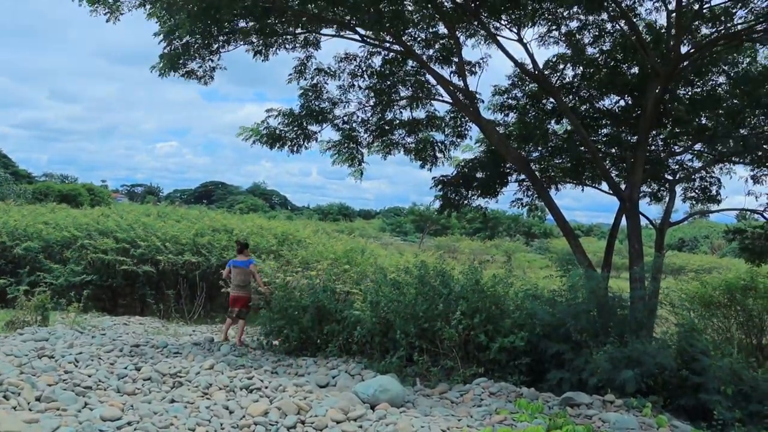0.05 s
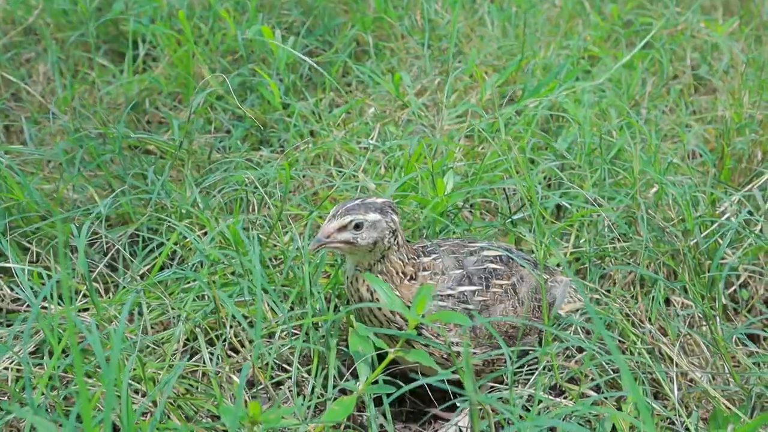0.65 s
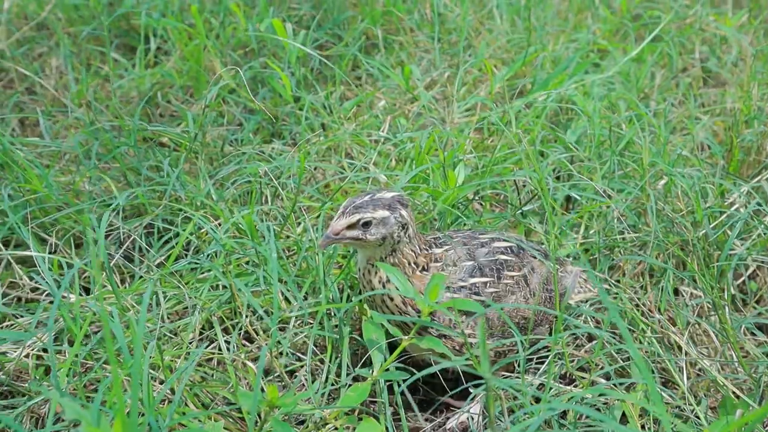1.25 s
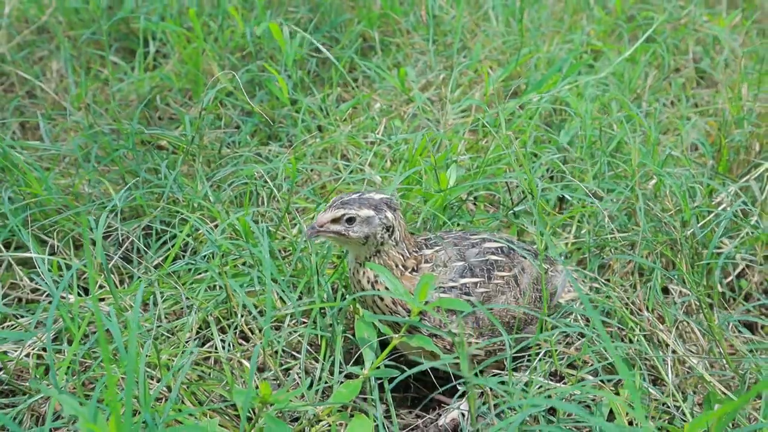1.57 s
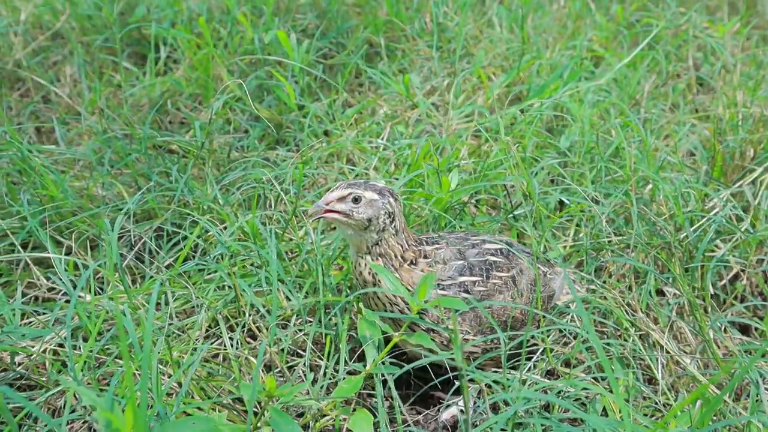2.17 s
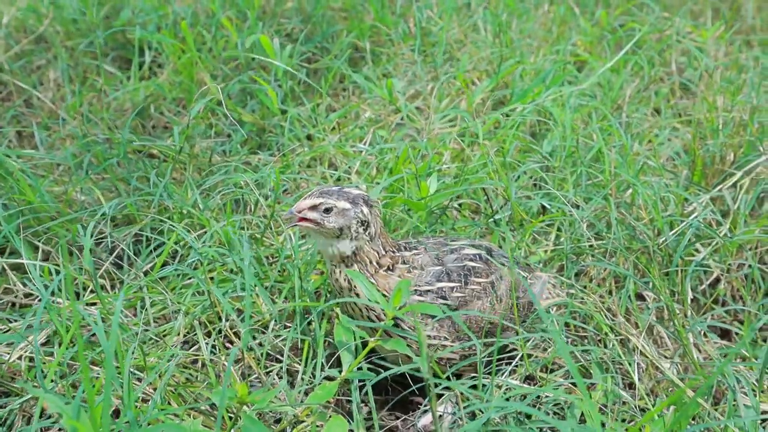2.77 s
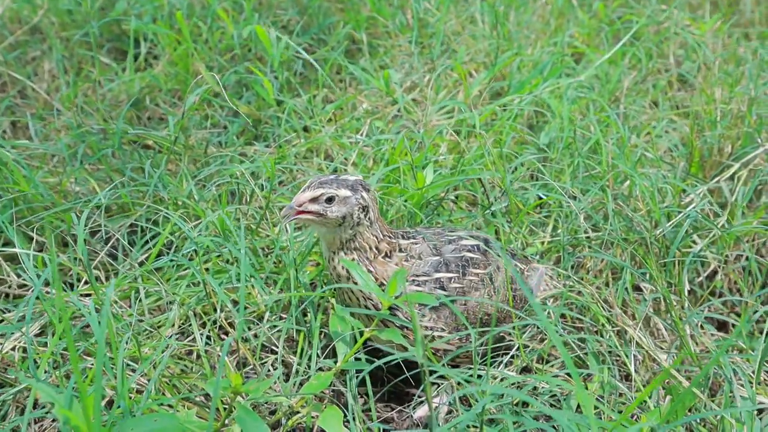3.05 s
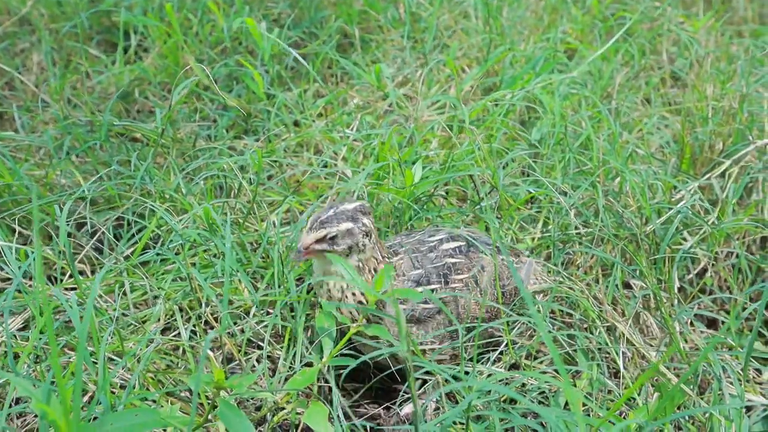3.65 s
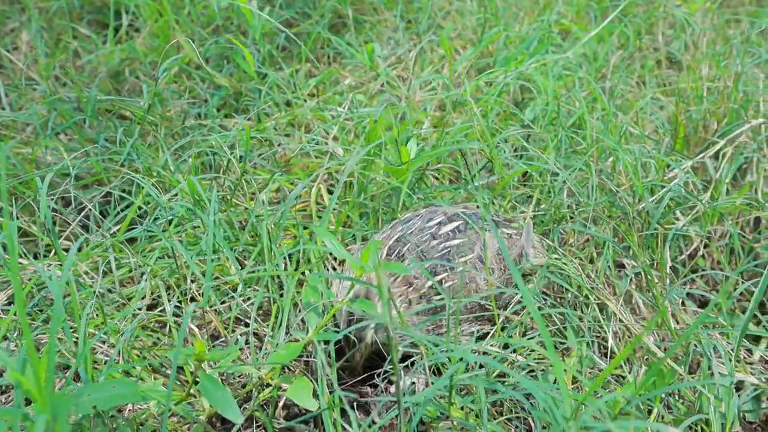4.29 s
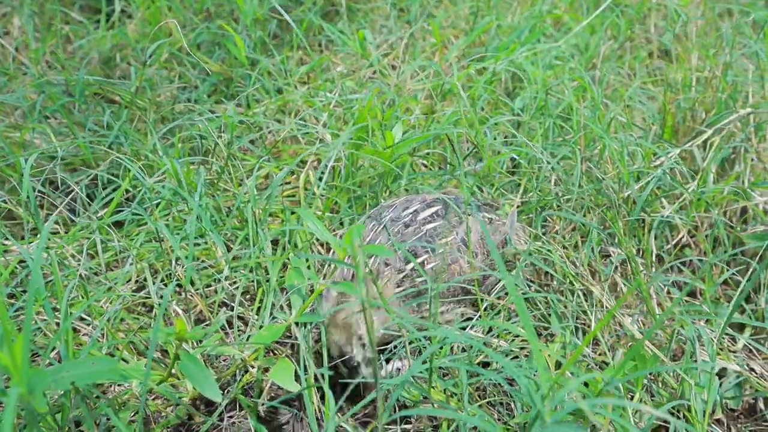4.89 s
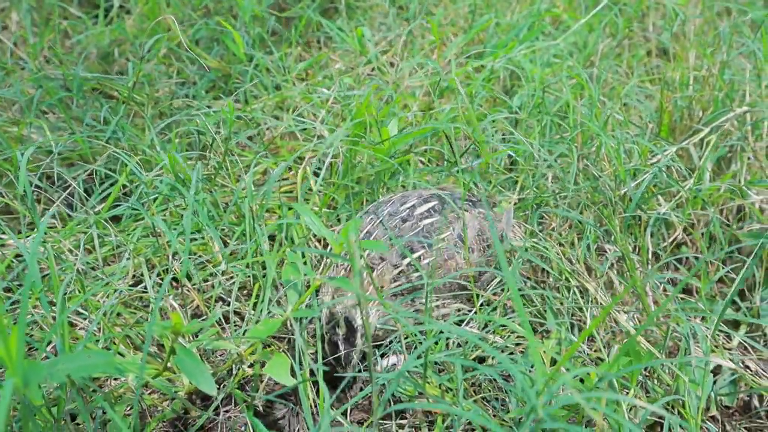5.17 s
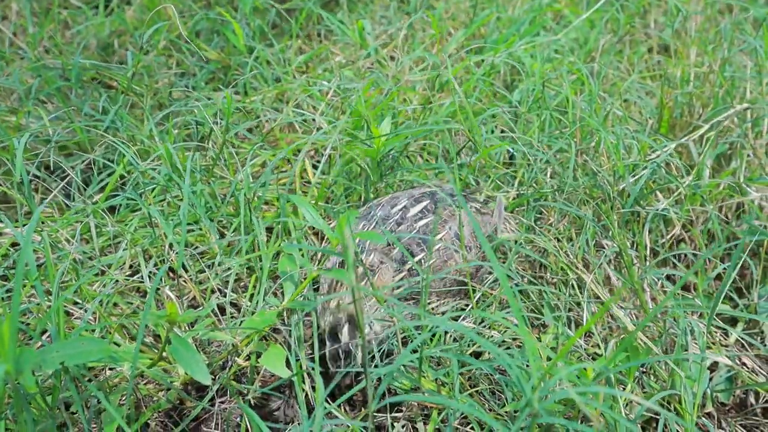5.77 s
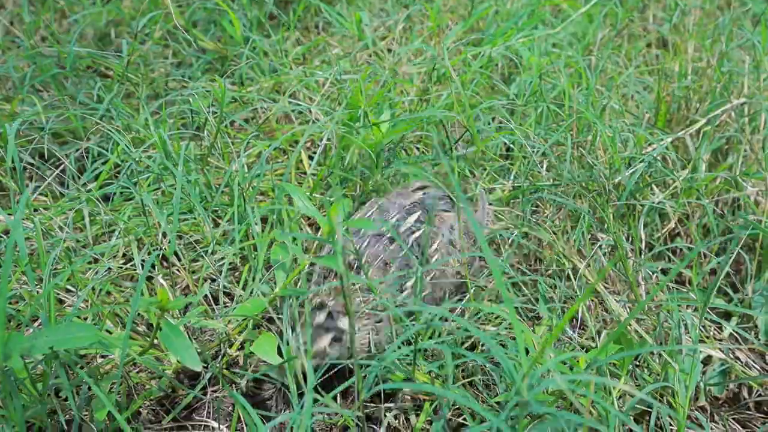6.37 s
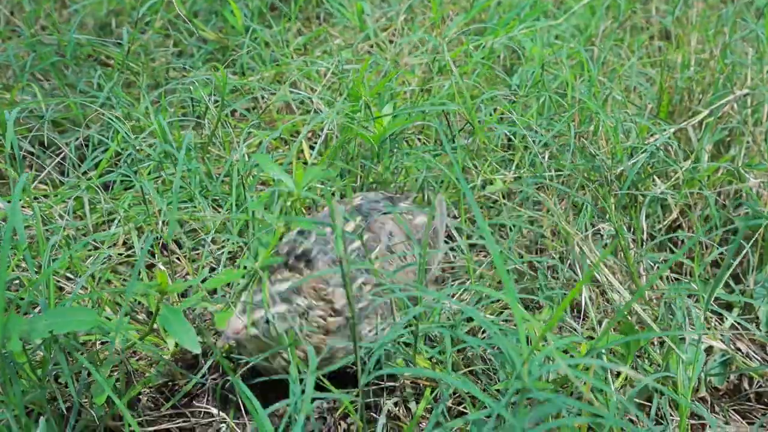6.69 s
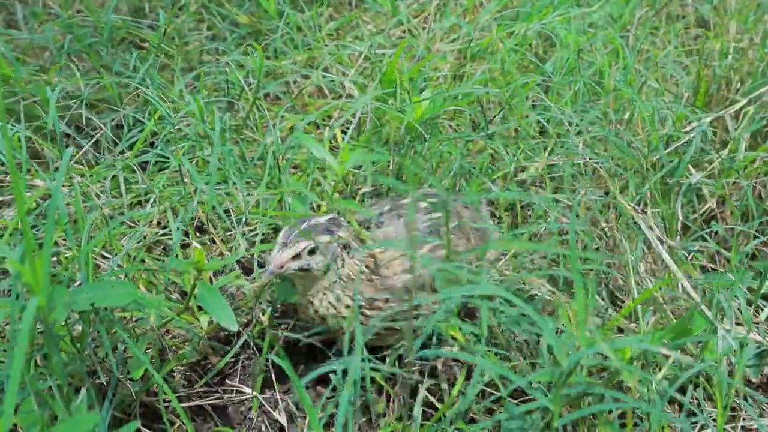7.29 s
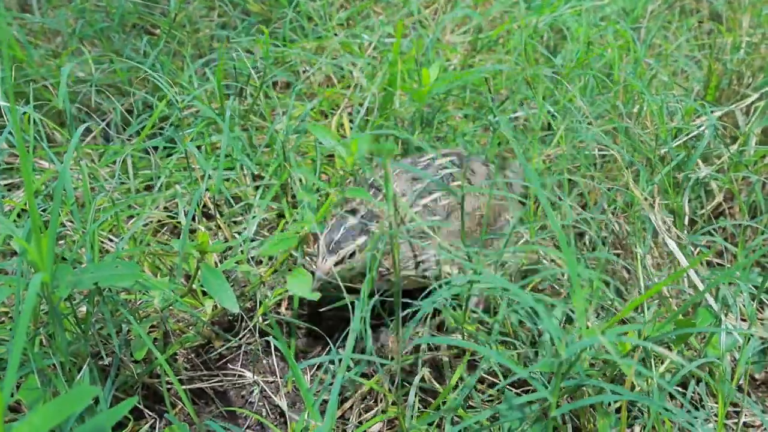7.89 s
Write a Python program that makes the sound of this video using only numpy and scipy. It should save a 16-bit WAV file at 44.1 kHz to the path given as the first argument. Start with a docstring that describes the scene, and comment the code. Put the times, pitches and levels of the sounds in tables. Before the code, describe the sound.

After a brief wind rumble, a young quail gives thin rising whistles close by, with microphone bumps and dry grass rustling at the end.

```python
"""An open river bank in a moment of wind, then a cut to a meadow where a young quail sits close by.
Its syrinx gives two short chirps and four thin rising whistles; two whistles start in a rasp, as the
period doubles and pulses ring the throat. Then it pushes off through dry stems that rustle and snap.
Bumps rock the hand-held microphone and fingers ring its casing.
A slow engine, small birds and an insect sound far away over the hush of the air."""
import sys
import numpy as np
from scipy import signal
from scipy.fft import rfft, irfft, next_fast_len
from scipy.io import wavfile
from scipy.ndimage import uniform_filter1d, map_coordinates

SR = 44100
rng = np.random.default_rng(int(sys.argv[2]) if len(sys.argv) > 2 else 0)


def put_to_file(sound):
    """Save the sound as 16-bit audio at rate SR, in the file named by the first command-line argument."""
    columns = np.atleast_2d(sound).T  # one column per channel
    safe = np.clip(columns, -1, 1)
    whole_steps = np.round(safe * 32767)
    wavfile.write(sys.argv[1], SR, whole_steps.astype(np.int16))


N = 350009
T = np.arange(N) / SR
BANK_END_S, MEADOW_START_S = 0.508, 0.5415
ATTACK_S = 0.0032  # onset of a whistle or chirp
# spectrum of dry grass: f/Hz, spectral level/dB
GRASS_SPECTRUM = [(500, -15), (2000, -1), (4000, 2.5), (5800, -2), (8000, -0.5), (10400, 0.5), (13000, -10),
                  (16000, -32)]


def from_db(db):
    """Amplitude ratio of a level."""
    return 10 ** (np.asarray(db) / 20)


def unit_rms(x):
    """Normalisation to rms 1."""
    return x / np.sqrt(np.mean(x ** 2) + 1e-20)


def in_time(rows, t=T):
    """Linear interpolation of each column against the first."""
    times, *columns = np.transpose(rows)
    return [np.interp(t, times, column) for column in columns]


def swell(rows):
    """Amplitude envelope of a (t/s, level/dB) curve, silent outside its span."""
    return from_db(in_time(rows)[0]) * (T > rows[0][0]) * (T < rows[-1][0])


def at_hz(points, hz):
    """Interpolation of a spectrum on a logarithmic frequency axis."""
    f, value = np.transpose(points)
    return np.interp(np.log(hz + 1e-9), np.log(f), value)


def butter(x, hz, kind, order=2):
    """Butterworth filter: a maximally flat passband."""
    return signal.sosfilt(signal.butter(order, hz, kind, fs=SR, output="sos"), x + 1e-18)


def drift(rate_hz):
    """Smooth random modulation, mostly below rate_hz; rms 1."""
    knots = rng.standard_normal(N // 20)
    return unit_rms(map_coordinates(knots, [T * rate_hz * 2], order=2, mode="wrap"))


def colour(x, spectrum):
    """Spectral shaping of a noise; rms 1."""
    size = next_fast_len(N)
    gain = from_db(at_hz(spectrum, np.fft.rfftfreq(size, 1 / SR)))
    return unit_rms(irfft(rfft(x, size) * gain, size)[..., :N])


def ring(clicks, modes):
    """Modal resonance: each impulse excites damped sines (f/Hz, level/dB, T60/s)."""
    out = 0
    for hz, db, t60 in modes:
        r, w = from_db(-60 / (t60 * SR)), 2 * np.pi * hz / SR
        mode = signal.lfilter([0, np.sin(w)], [1, -2 * r * np.cos(w), r * r], clicks + 1e-18)
        out = out + from_db(db) * mode
    return out


def stereo(mid, side):
    """Sum and difference give left and right."""
    return np.array([mid + side, mid - side])


def diffuse(spectrum):
    """Diffuse field: the channels agree in the bass and tend to oppose in the treble; mid rms 1."""
    # side relative to mid: f/Hz, level/dB
    side_spectrum = [(60, -21), (130, -13.5), (220, -7.5), (380, -1), (700, 0), (1400, 0.5), (2500, 4),
                     (4400, 5.5), (15000, 5)]
    size = next_fast_len(N)
    hz = np.fft.rfftfreq(size, 1 / SR)
    mid, side = rfft(rng.standard_normal((2, size))) * from_db(at_hz(spectrum, hz))
    mid = irfft(mid, size)[:N]
    side = irfft(side * from_db(at_hz(side_spectrum, hz)), size)[:N]
    return stereo(mid, side) / mid.std()


def ports(phase, hz, pan_db, delay_s=0.00012):
    """Level and time difference: a partial is louder and earlier at the nearer microphone port."""
    lead = np.pi * hz * delay_s * np.copysign(1, pan_db.mean())
    gains = from_db(np.array([pan_db, -pan_db]) / 2)
    return np.sqrt(2 / np.mean(gains ** 2, axis=0)) * gains * np.sin(phase + np.array([lead, -lead]))


def scattering(x, wet_db=-24, t60=0.16):
    """Scattering from ground and bushes adds a short, exponentially decaying tail."""
    t = T[:SR // 2]
    tails = rng.standard_normal((2, len(t))) * from_db(-60 * t / t60) * (t > .004)
    tails /= np.linalg.norm(tails, axis=1, keepdims=True)
    return x + from_db(wet_db) * signal.fftconvolve(x, tails, axes=1)[:, :N]


def air(level_db=-43.5, breeze_share=0.65, boom_cut=0.27, flicker_db=1.24):
    """Ambient noise: a diffuse hush whose middle range swells with the breeze."""
    # open air: f/Hz, spectral level/dB
    spectrum = [(25, -9), (60, -6), (125, -2.5), (145, 0), (212, -7), (285, -9), (440, -15), (700, -16.5),
                (1100, -20), (1520, -20), (5700, -31), (10900, -33), (12600, -45), (15500, -63)]
    # strength of the breeze: t/s, level/dB
    breeze = [(0.56, -41), (0.76, -44.5), (1.19, -48), (1.59, -44.5), (1.77, -48), (3.0, -51), (6.3, -50),
              (7.93, -49.5)]
    hush = diffuse(spectrum)
    hush = hush - boom_cut * butter(hush, [100, 200], "band", order=1)
    breeze_db = in_time(breeze)[0]
    lift = from_db(breeze_share * (breeze_db - np.median(breeze_db)) + flicker_db * drift(4.1)) - 1
    return from_db(level_db) * (hush + lift * butter(hush, [200, 1600], "band", order=1))


def bank_wind(gust_below_hz=900):
    """Wind noise: gusts modulate the amplitude of the low rumble; the hiss above stays even."""
    # wind on the bank: f/Hz, spectral level/dB
    spectrum = [(15, -50), (25, -21), (80, -3), (166, -1.5), (335, -8), (384, -11.5), (476, -14.5),
                (1020, -26), (2220, -30.5), (7920, -40.5), (10700, -39), (14400, -58), (16000, -80)]
    # gusts: t/s, level/dB
    gusts = [(0.0, -43), (0.128, -31), (0.218, -40.5), (0.286, -31.5), (0.49, -33.5)]
    wind, gain = diffuse(spectrum), from_db(in_time(gusts)[0])
    mean_gain = gain[T < BANK_END_S].mean()
    return mean_gain * wind + (gain - mean_gain) * butter(wind, gust_below_hz, "low", order=1)


def rumble(band_hz=(70, 115)):
    """Narrow-band noise: a faint deep swell in the distance."""
    # rise and fall of the rumble: t/s, level/dB
    envelope = [(4.9, -58), (5.3, -53.5), (5.75, -49), (6.1, -56), (6.3, -66)]
    return swell(envelope) * unit_rms(butter(rng.standard_normal(N), band_hz, "band"))


def far_engine(wander=0.01183, uneven_db=1.0):
    """The pulse train of one slow cylinder excites exhaust resonances; only their boom carries."""
    # running of the engine: t/s, firing rate/Hz, level/dB
    running = [(.5, 20, -56), (1.5, 26.4, -55), (2.3, 24.5, -50), (5.0, 24.2, -48), (6.4, 26.8, -46.5),
               (7.0, 24.6, -47), (7.9, 21.8, -55.5)]
    # exhaust resonances: f/Hz, level/dB, T60/s
    exhaust_modes = [(97, -41, 0.02), (146.8, 2, 0.091), (200, -8, 0.069), (283, -14, 0.067)]
    firing_hz, level_db = in_time(running)
    turns = np.floor(np.cumsum(firing_hz * (1 + wander * drift(6))) / SR)
    firings = np.diff(turns, prepend=0) * from_db(uneven_db * np.tanh(drift(5.1)))
    return from_db(level_db) * unit_rms(ring(firings, exhaust_modes))


def insect(hz=7300, level_db=-65, width_hz=25, start_s=5.0):
    """Random amplitude modulation spreads a tone into a thin, distant trill."""
    trill = drift(width_hz) * np.sin(2 * np.pi * hz * T) * (T > start_s)
    return from_db(level_db) * stereo(0.32 * trill, trill)


def far_twitters(warble=0.076, warble_hz=45, fall=.08, rattle_hz=130, rattle_below_hz=4700, trim_db=-1):
    """Frequency modulation warbles falling bird notes; amplitude modulation rattles the lower ones."""
    # notes: t/s, level/dB, f/Hz, half length/s
    notes = [(0.492, -49, 5500, 0.0072), (2.528, -56, 4200, 0.043), (3.47, -53, 4847, .05),
             (3.573, -52, 4240, 0.1), (3.93, -57, 5570, 0.047), (5.376, -53, 3970, .05),
             (5.606, -53, 3940, 0.074), (5.833, -53, 3880, 0.052), (6.073, -54.5, 4500, 0.053),
             (6.77, -48.5, 4150, 0.023), (7.007, -54, 4170, 0.0234)]
    out, wobble = np.zeros((2, N)), 1 + warble * drift(warble_hz)
    rattle = 2.4 * np.sin(np.pi * np.cumsum(rattle_hz * (1 + .3 * drift(80))) / SR) ** 4
    phase_noise = 1.4 * drift(500)
    for s, db, pitch_hz, half_s in notes:
        on = abs(T - s) < half_s
        along = (T[on] - s) / half_s
        hz = pitch_hz * wobble[on] * (1 - fall * along)
        gain = from_db(db + trim_db) * np.cos(np.pi / 2 * along)
        phase = 2 * np.pi * np.cumsum(hz) / SR
        if pitch_hz < rattle_below_hz:
            gain, phase = gain * rattle[on], phase + phase_noise[on]
        out[:, on] += gain * ports(phase, hz, np.ones_like(hz))
    return scattering(out, wet_db=-2.5, t60=0.041)


def far_ticks(pan_db=7, grain_rad=0.67):
    """A bird in the bushes to the left: downward frequency sweeps so fast that they sound as ticks."""
    # sweeps: t/s, level/dB, f/Hz, half length/s, swing as a share of f
    sweeps = [(2.181, -42, 2670, .006, 0.46), (5.864, -46, 3900, .012, .2), (6.575, -46, 4050, 0.0083, .19),
              (6.782, -48, 3920, .007, 0.11), (6.813, -40.5, 4050, 0.0096, 0.19),
              (7.764, -43.5, 4100, 0.0081, 0.14)]
    out, phase_noise = np.zeros((2, N)), grain_rad * drift(600)
    for s, db, pitch_hz, half_s, swing in sweeps:
        on = abs(T - s) < half_s
        along = (T[on] - s) / half_s
        hz = pitch_hz * (1 - swing * along)
        phase = 2 * np.pi * np.cumsum(hz) / SR + phase_noise[on]
        gain = from_db(db) * np.cos(np.pi / 2 * along)
        out[:, on] += gain * ports(phase, hz, np.full_like(hz, pan_db))
    return scattering(out, wet_db=-8.0, t60=0.12)


def far_chips(swing=0.39, upturn_s=.06, pan_db=3, grain_rad=.7):
    """Parabolic glides: a far bird's thin notes drop and level out; the longer ones turn up again."""
    # notes: t/s at the lowest pitch, level/dB, lowest f/Hz, fall/s, rise/s
    notes = [(2.915, -51, 4700, .025, .006), (3.032, -49.5, 4880, .034, .03),
             (3.132, -50, 4800, .024, .008), (3.25, -52, 4920, .028, .04), (3.362, -51, 4900, .022, .006)]
    out, phase_noise = np.zeros((2, N)), grain_rad * drift(400)
    for s, db, lowest_hz, fall_s, rise_s in notes:
        on = (T > s - fall_s) & (T < s + rise_s)
        t = T[on] - s
        along = t / np.where(t < 0, fall_s, rise_s)
        hz = lowest_hz * (1 + swing * np.where(t < 0, along, t / upturn_s) ** 2)
        phase = 2 * np.pi * np.cumsum(hz) / SR + phase_noise[on]
        out[:, on] += from_db(db) * (1 - along ** 2) * ports(phase, hz, np.full_like(hz, pan_db))
    return scattering(out, wet_db=-13, t60=0.1)


def thumps(pan_db=5.0, skew=0.35):
    """Bumps rock the microphone for a few cycles; asymmetric stiffness adds a second harmonic."""
    # bumps: t/s, level/dB, f/Hz, half length/s
    bumps = [(1.485, -32, 55, 0.024), (2.741, -26.5, 64.6, 0.014), (2.797, -16.5, 80, 0.026),
             (3.029, -24, 69.6, 0.017), (3.11, -31, 55.6, 0.019), (3.181, -24, 57.7, 0.01),
             (3.217, -32, 64, 0.033), (4.403, -37, 50, 0.048), (4.458, -27.5, 68, 0.012),
             (4.566, -29, 64.2, 0.021)]
    out = np.zeros(N)
    for s, db, hz, half_s in bumps:
        on = abs(T - s) < half_s
        t = T[on] - s
        phase, shape = 2 * np.pi * hz * t, np.cos(np.pi / 2 * t / half_s) ** 2
        out[on] += from_db(db) * shape * (skew * shape * np.sin(2 * phase) - np.cos(phase))
    return out * from_db([[pan_db / 2], [-pan_db / 2]])


def handling(knock_db=-1, slip_hz=430, slip_scatter=0.18, creak_db=3, width_db=-9):
    """Finger impacts and one creak of stick-slip friction excite the modes of the casing."""
    # impacts: t/s, level/dB, low-pass f/Hz
    knocks = [(0.587, -31.5, 2000), (.683, -29, 1200), (.690, -29, 695), (.697, -23, 700),
              (.706, -28, 1200), (1.437, -22, 293), (1.57, -28.5, 1800), (1.603, -33, 1500),
              (1.607, -27, 1800), (1.642, -35, 1200), (1.651, -28, 500), (1.782, -39, 701),
              (4.055, -32.5, 300), (6.023, -30, 500), (6.519, -51, 700), (7.109, -36.5, 1490)]
    # casing resonances: f/Hz, level/dB, T60/s
    modes = [(264, -28, 0.009), (390, 1.5, 0.014), (545, 1.5, 0.0095), (1216, 0.5, 0.011),
             (1880, 5, 0.0035)]
    # the slipping grip: t/s, level/dB
    creak = [(1.572, -60), (1.578, -35), (1.590, -41), (1.604, -38), (1.612, -70)]
    clicks = np.zeros(N)
    for s, db, bright_hz in knocks:
        at = round(s * SR)
        clicks[at:at + 512] += from_db(db + knock_db) * butter(signal.unit_impulse(512), bright_hz, "low")
    turns = np.floor(np.cumsum(slip_hz * (1 + slip_scatter * drift(200))) / SR)
    slips = np.diff(turns, prepend=0) * swell(creak) * from_db(creak_db)
    body = butter(ring(clicks, modes), (180, 2200), "band")
    body += butter(ring(slips, modes), (900, 1900), "band")
    return stereo(body, from_db(width_db) * butter(body, 500, "high"))


def pushes(settle_ratio=1.16, stir_from_s=7.45, stir_db=-59.5):
    """Incoherent pushes and a faint last stirring add in power; gives gain and coarse-stalk share."""
    # the bird's pushes: t/s, peak level/dB, swell time constant/s, share of coarse stalk
    strokes = [(7.005, -48, 0.086, 0.35), (7.105, -50, 0.012, 0), (7.205, -47, 0.074, 0.5),
               (7.285, -52.5, .026, 0.7), (7.488, -43, 0.021, 0.1), (7.69, -45.5, 0.038, 0.96)]
    power = from_db(stir_db) ** 2 * (T > stir_from_s) + 1e-18
    coarse = power / 2
    for s, db, swell_s, share in strokes:
        tau_s = swell_s * np.where(T < s, 1, settle_ratio)
        push = (from_db(db) * np.exp(-abs(T - s) / tau_s)) ** 2
        power, coarse = power + push, coarse + share * push
    return np.sqrt(power), coarse / power


def blade_ticks(ticks_per_s=4000, spread_db=0.5, t60=0.0017, dry_share=0.61):
    """Shot noise: tiny random impacts, each ringing at the pitch of its own blade; rms 1."""
    blade_hz = np.linspace(1500, 13500, 13)
    sizes = from_db(spread_db * np.minimum(rng.exponential(1, (2, N)), 4)) * rng.choice([-1, 1], (2, N))
    clicks = sizes * (rng.random((2, N)) < ticks_per_s / SR)
    blade = rng.integers(0, len(blade_hz), (2, N))
    rings = sum(ring(clicks * (blade == k), [(hz, 0, t60)]) for k, hz in enumerate(blade_hz))
    return colour(unit_rms(rings) + dry_share * unit_rms(clicks), GRASS_SPECTRUM)


def snaps(crack_db=-10, crack_s=0.001, stem_db=-14, stem_s=0.0035, stem_t60=0.0023):
    """Brittle fracture: a stem gives a broadband crack and buzzes briefly at its own resonance."""
    # breaking stems: t/s, level/dB, f/Hz, left minus right/dB
    fractures = [(5.928, -39, 11520, 5), (5.947, -31, 8200, -9), (6.226, -29, 2600, 2),
                 (7.003, -37, 10000, 0), (7.099, -26, 10700, -9), (7.109, -32, 6300, 0),
                 (7.208, -24, 10000, -4), (7.4638, -23, 8460, 1), (7.476, -35, 8000, 0),
                 (7.487, -31, 10500, 0), (7.491, -20.5, 4600, -2), (7.682, -27, 3200, 0),
                 (7.694, -28, 3500, 0), (7.728, -35, 4100, 0)]
    out, t = np.zeros((2, N)), T[:SR // 20]
    noise = colour(rng.standard_normal((2, N)), GRASS_SPECTRUM)
    crack = unit_rms(butter(noise, 3000, "high", order=1))
    for s, db, hz, pan_db in fractures:
        on = slice(round(s * SR), round(s * SR) + len(t))
        stem = unit_rms(ring(rng.standard_normal((2, len(t))), [(hz, 0, stem_t60)]))
        snap = from_db(crack_db) * np.exp(-t / crack_s) * crack[:, on]
        snap += from_db(stem_db) * np.exp(-t / stem_s) * stem
        out[:, on] += from_db(db + np.array([[pan_db], [-pan_db]]) / 2) * snap
    return out


def grass(side_db=-0.5, rustle_db=2, crossover_hz=4200, clump_db=1.3, clump_hz=70):
    """Friction noise: blades scrape past in uneven clumps of ticks; stalks add a lower crunch."""
    gain, coarse = pushes()
    rustle = from_db(rustle_db + clump_db * drift(clump_hz)) * gain * blade_ticks()
    blades = butter(rustle, crossover_hz, "high", order=1)
    stalks = butter(coarse * rustle, crossover_hz, "low", order=1)
    mid, side = blades + stalks
    return stereo(mid, from_db(side_db) * side)


def chirps(octave_db=-18.5, pan_db=-2):
    """U-shaped frequency glides: a ragged fall, a clear held bottom, an upward flick."""
    # chirps: t/s at the lowest pitch, level/dB, lowest f/Hz, fall/s, rise/s
    notes = [(1.256, -35, 3020, 0.048, 0.028), (3.642, -41.5, 3050, 0.022, 0.021)]
    # contour: place (start -1, bottom 0, end 1), f over lowest f, level/dB, third partial/dB, roughness
    contour = [(-1, 1.42, -13, -34, .5), (-0.81, 1.28, -4, -32, .6), (-.45, 1.19, -9.5, -15, .6),
               (-.25, 1.05, -1, -24, .2), (-0.17, 1, -0.5, -31, 0), (0.57, 1.06, -2, -30, .15),
               (.75, 1.2, -5, -29, .5), (0.93, 1.36, 0, -35, .4)]
    for s, db, lowest_hz, fall_s, rise_s in notes:
        on = (T > s - fall_s) & (T < s + rise_s)
        t = T[on] - s
        ratio, shape_db, third_db, rough = in_time(contour, t / np.where(t < 0, fall_s, rise_s))
        edges = np.clip(np.minimum(t + fall_s, rise_s - t) / ATTACK_S, 0, 1)
        gain = edges * from_db(db + shape_db)
        yield on, lowest_hz * ratio, gain, rough, 0, 0, (octave_db, third_db), pan_db


def whistles(climb_hz=(1430, 1830), quaver_hz=22.04, flutter_db=2, release_s=0.01,
             clearing_s=0.019, hoarse_easing=0.64, clear_roughness=0.065):
    """Rising glides whose modulation deepens as they climb; a hoarse start eases, then snaps clear."""
    # four whistles, each a plateau and then a climb: t/s, f/Hz, level/dB
    first = [(0.661, 1202, -34.5), (0.716, 1385, -39), (0.74, 1275, -32.5), (0.86, 1330, -30),
             (0.885, 1430, -37), (0.948, 1600, -35), (1.035, 2375, -38.5), (1.078, 2885, -33),
             (1.1, 3110, -43), (1.124, 3640, -45)]
    second = [(2.95, 1095, -58), (3.01, 1140, -55), (3.025, 1215, -47.5), (3.125, 1255, -42),
              (3.15, 1370, -43.5), (3.2, 1400, -44.5), (3.22, 1470, -47), (3.27, 1530, -47),
              (3.315, 1443, -41.5), (3.345, 1620, -50), (3.37, 1850, -46), (3.415, 2175, -49),
              (3.445, 2670, -69), (3.48, 3500, -35.5), (3.498, 3950, -45), (3.522, 4200, -55)]
    third = [(4.07, 940, -51), (4.156, 886, -50), (4.18, 920, -42.5), (4.205, 1020, -42),
             (4.235, 1300, -38.5), (4.364, 1230, -38), (4.458, 1762, -37), (4.49, 1635, -35.5),
             (4.51, 1880, -43), (4.547, 1950, -42.5), (4.568, 1820, -38.5), (4.595, 1983, -47.5),
             (4.668, 2140, -52)]
    fourth = [(6.41, 845, -55), (6.455, 849, -49), (6.49, 976, -49), (6.51, 1058, -50), (6.538, 982, -48.5),
              (6.553, 1217, -46), (6.591, 1203, -47.5), (6.615, 1430, -43), (6.648, 1530, -45),
              (6.672, 1816, -57), (6.705, 1816, -59), (6.73, 1990, -45.5), (6.77, 1852, -52.5),
              (6.82, 2138, -42), (6.85, 2134, -38.5), (6.882, 2630, -43), (6.9, 2275, -38.5),
              (6.925, 2297, -41), (6.942, 2446, -44), (6.98, 2316, -45), (7.008, 2076, -43.5),
              (7.038, 2330, -42.5), (7.055, 2190, -41.5), (7.072, 3030, -43.5), (7.086, 4700, -46)]
    # voice of each: hoarse start/s, subharmonic/dB, overtones/dB, left minus right/dB,
    # quaver as a share of f, roughness of the climb
    voicings = [(0, -20, -3, 9, 0.02, 0.12), (0, -20, -10, 5, 0.0065, .05),
                (0.153, -14, -5, 3.5, 0.0032, 0.04), (0.139, -4.5, 0, -12, 0.0085, 0.16)]
    # the octave, strongest in mid climb: fundamental f/Hz, level/dB
    octave_curve = [(1280, -24), (1500, -11), (1900, -8), (2300, -6), (2800, -32)]
    unsteady_db = flutter_db * drift(28)
    for rows, voicing in zip((first, second, third, fourth), voicings):
        hoarse_s, sub_db, overtone_db, pan_db, quaver, grain = voicing
        on = (T > rows[0][0]) & (T < rows[-1][0])
        age, remaining = T[on] - rows[0][0], rows[-1][0] - T[on]
        hz, db = in_time(rows, T[on])
        climb = np.interp(hz, climb_hz, (0, 1))
        hz = hz * (1 - quaver * climb * np.sin(2 * np.pi * quaver_hz * age))
        edges = np.minimum(age / ATTACK_S, 1) * np.minimum(remaining / release_s, 1)
        gain = edges * from_db(db + climb * unsteady_db[on])
        hoarse = np.clip((hoarse_s - age) / clearing_s + .5, 0, 1) * (hoarse_s > clearing_s)
        rasp = hoarse * (1 - hoarse_easing * age / max(hoarse_s, clearing_s))
        rough = np.clip(clear_roughness + grain * climb + rasp, 0, 1)
        octave_db = overtone_db + at_hz(octave_curve, hz)
        third_db = np.minimum(octave_db - 1.5, -21)
        yield on, hz, gain, rough, hoarse, sub_db, (octave_db, third_db), pan_db


def croak(phase, rough):
    """Period doubling: the syrinx claps every second cycle, unevenly if rough, and rings the throat."""
    # throat resonances: f/Hz, level/dB, T60/s
    throat_modes = [(1020, -11, 0.0051), (1400, 7, 0.0052), (1750, -19, .004)]
    noise = rng.standard_normal(len(phase))
    slip = rough ** 2 * unit_rms(uniform_filter1d(noise, size=120)) / 2
    turns = np.maximum.accumulate(np.floor((phase / 2 + slip) / (2 * np.pi)))
    return unit_rms(ring(np.diff(turns, prepend=turns[0]), throat_modes))


def quail(jitter=0.0035, shimmer_db=0.54, rasp_hz=390, rasp_scatter=0.23, rasp_depth=0.43,
          rasp_bend_rad=0.85, overtone_pan_share=0.76, croak_db=-4, tone_loss=0.68, half_line_db=-5):
    """Source and filter: the beak shapes the overtones of a nearly pure tone that croaks when hoarse."""
    # response of the beak: f/Hz, gain/dB
    beak = ((3000, 0), (4600, 1), (5300, -8), (7500, -7), (9200, 2), (10500, 11), (13000, 0))
    out = np.zeros((2, N))
    waver = 1 + jitter * drift(90)
    tremble_db, flicker_db = shimmer_db * drift(60), 1.5 * drift(50)
    rasp_phase = 2 * np.pi * np.cumsum(rasp_hz * (1 + rasp_scatter * drift(150))) / SR
    phase_noise, sway_db = rasp_bend_rad * drift(260), 3.0 * drift(18)
    for on, hz, gain, rough, hoarse, sub_db, overtones_db, side_db in (*whistles(), *chirps()):
        phase = 2 * np.pi * np.cumsum(hz * waver[on]) / SR + rough * phase_noise[on]
        gain = gain * from_db(tremble_db[on]) * (1 + rasp_depth * rough * np.sin(rasp_phase[on]))
        width = 1 - hoarse / 2  # hoarse notes sit nearer the middle, as do high ones
        pan_db = side_db * np.minimum(1280 / hz, 1) * width + sway_db[on] - sway_db[on].mean()
        voice = (1 - tone_loss * hoarse) * ports(phase, hz, pan_db)
        croak_gain = hoarse * from_db(croak_db + np.array([pan_db, -pan_db]) * width / 2)
        voice += croak_gain * croak(phase, rough)
        for k, partial_db in zip((2, 3), overtones_db):
            partial_gain = from_db(partial_db + flicker_db[on] + at_hz(beak, k * hz))
            voice += partial_gain * ports(k * phase, k * hz, overtone_pan_share * pan_db)
        for k, partial_db in ((.5, sub_db), (1.5, half_line_db)):  # lines of the doubled period
            voice += hoarse * from_db(partial_db) * ports(k * phase, k * hz, pan_db)
        out[:, on] += gain * voice
    return out


def scene():
    """Superposition of the sources: the river bank, an instant of silence, the meadow."""
    birds = far_twitters() + far_ticks() + far_chips()
    near = scattering(quail()) + thumps() + handling() + grass() + snaps()
    meadow = near + birds + insect() + far_engine() + rumble() + air()
    bank_fade = np.exp(-np.maximum(T - BANK_END_S, 0) / .002)
    meadow_onset = np.clip((T - MEADOW_START_S) / .0003 + .5, 0, 1)
    return (bank_wind() + birds) * bank_fade + meadow * meadow_onset


def record(dry):
    """Band limiting: an elliptic low-pass cuts the top steeply."""
    cutoff_hz = 15700
    return signal.sosfilt(signal.ellip(10, .1, 90, cutoff_hz, fs=SR, output="sos"), dry)


dry = scene()
out = record(dry)
put_to_file(out)
```